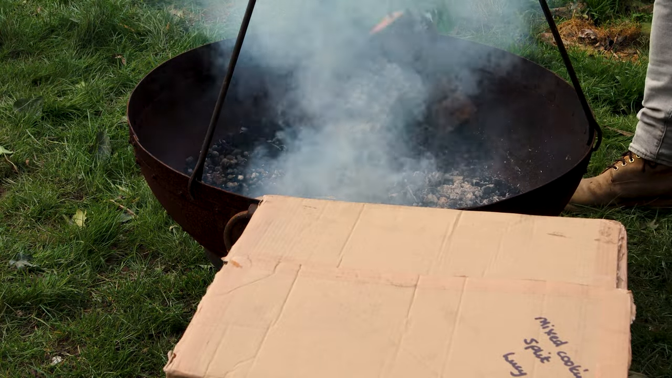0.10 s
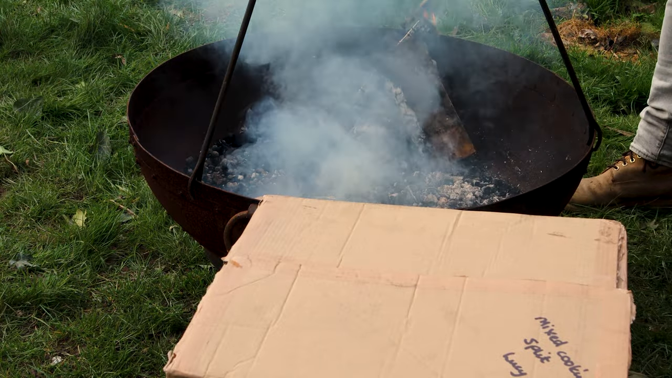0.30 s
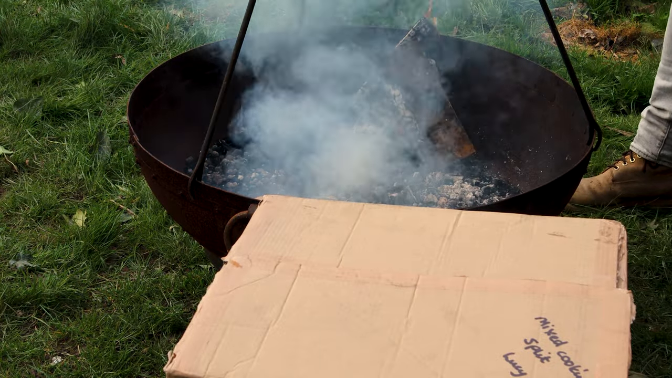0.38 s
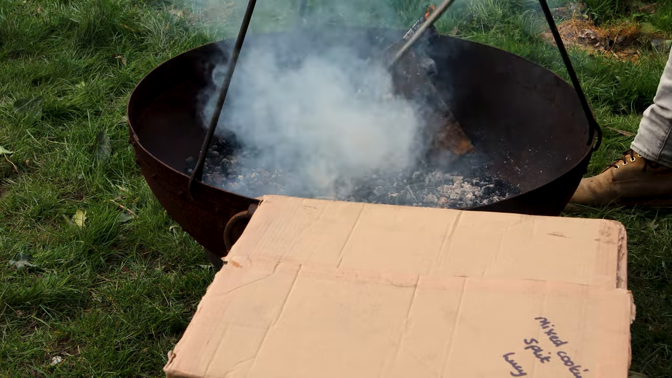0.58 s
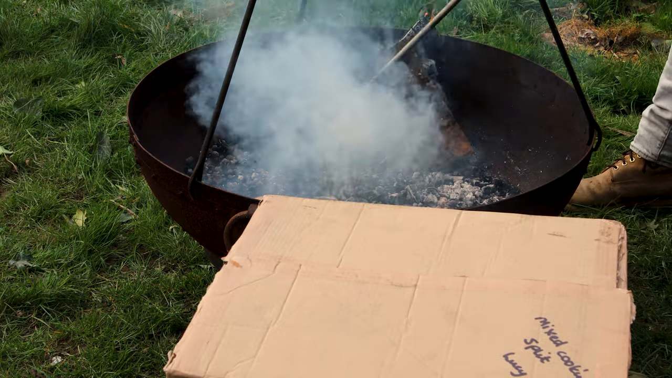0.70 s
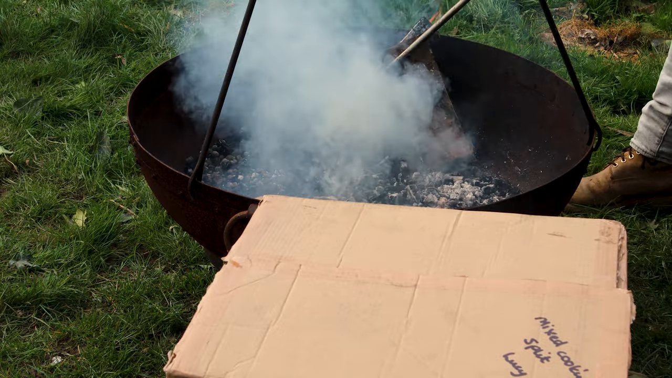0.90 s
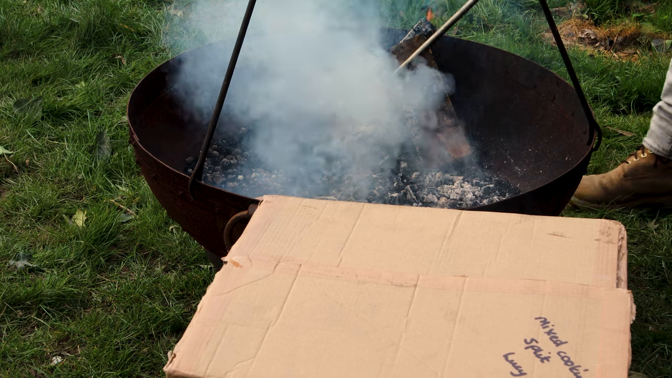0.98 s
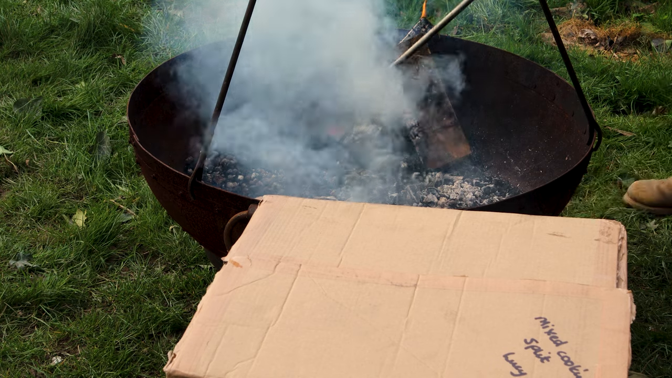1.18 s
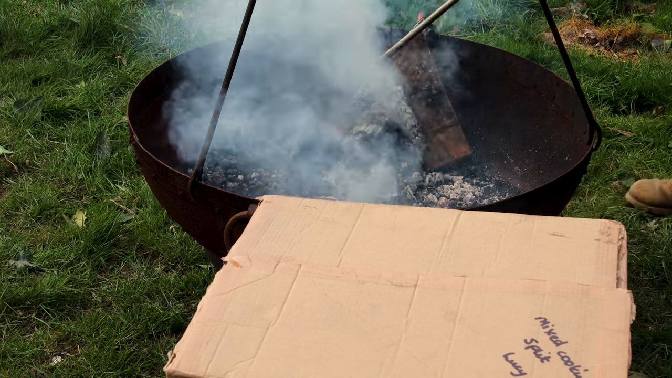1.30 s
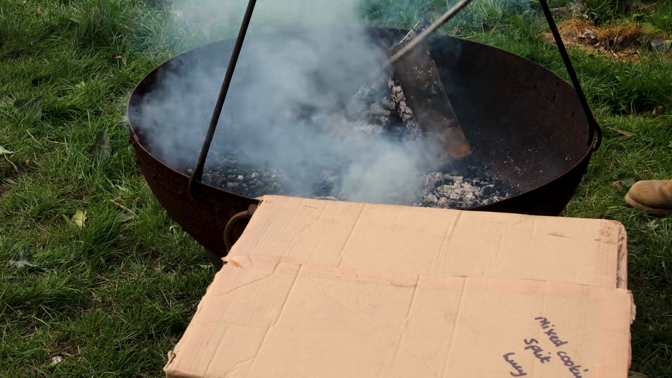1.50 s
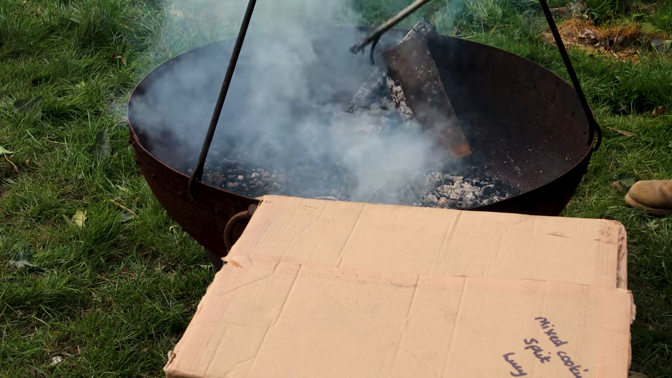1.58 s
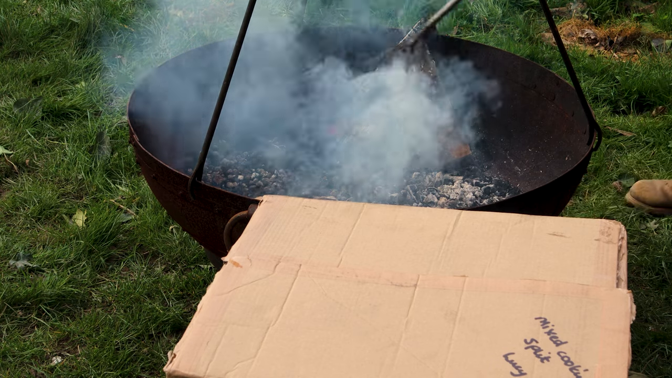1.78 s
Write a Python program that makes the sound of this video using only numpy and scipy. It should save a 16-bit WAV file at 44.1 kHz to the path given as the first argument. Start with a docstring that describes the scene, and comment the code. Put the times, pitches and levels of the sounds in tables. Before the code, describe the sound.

A burning log clangs hard against an iron fire bowl, with wooden knocks and charcoal crunches

```python
"""Tongs shift burning logs in an iron fire bowl, outdoors and close to the microphone.
Charcoal crunches as bursts of clicks, wood is dragged as uneven rubbing noise, and damped log modes knock.
A log then drops against the bowl: modes and ringing noise bands make a clang that overloads the recorder.
The tongs chatter on the iron as repeated struck modes, and more knocks, crunches and fainter blows follow.
Late on come two dry pops of noise; filtered snaps, ticking, a dull rustle and a low background run throughout."""
import sys
import numpy as np
from scipy import signal
from scipy.fft import rfft, irfft
from scipy.io import wavfile
from scipy.ndimage import uniform_filter1d

SR = 44100
rng = np.random.default_rng(int(sys.argv[2]) if len(sys.argv) > 2 else 0)


def to_wav(sig):
    """Store sig (one row per channel, or 1-D mono) as 16-bit WAV at the path in sys.argv[1].

    Samples outside -1..1 are clipped; the rate is SR.
    """
    pcm = np.clip(np.atleast_2d(sig), -1, 1) * 32767
    pcm = np.round(pcm).astype(np.int16)
    wavfile.write(sys.argv[1], SR, pcm.T)  # frames by channels


N = 79380
T = np.arange(N) / SR  # time/s


def undb(db):
    """Amplitude ratio: a level of 20 dB is a factor of ten."""
    return 10 ** (np.asarray(db) / 20)


def unit(x):
    """Normalisation: scale to an rms of 1."""
    return x / np.sqrt(np.mean(x ** 2) + 1e-18)


def at_hz(hz, table, axis=1):
    """Interpolation: read a table column on a logarithmic frequency axis."""
    table = np.array(table, float)
    return np.interp(np.log(hz), np.log(table[:, 0]), table[:, axis])


def colour(x, points, tilt_db=0):
    """Linear filtering: shape the spectrum, tilt it in dB per octave above 500 Hz, and set the rms to 1."""
    hz = np.fft.rfftfreq(N, 1 / SR) + 1
    tilt = tilt_db * np.log2(np.maximum(hz, 500))
    gain = undb(at_hz(hz, points) + tilt)
    return unit(irfft(rfft(x) * gain, N))


def noise():
    """Random excitation: white Gaussian noise."""
    return rng.standard_normal(N)


def delay(x, s):
    """Time shift: start x at s seconds."""
    return np.concatenate([np.zeros(max(int(s * SR), 0)), x, np.zeros(N)])[:N]


def grains(rate, spread_db):
    """Random impulse train: clicks of either sign at a mean rate per second, mostly small, a few large."""
    present = rng.random(N) < rate / SR
    sign = rng.choice([-1, 1], N)
    return present * sign * undb(spread_db * np.minimum(rng.exponential(size=N), 4))


def fade(t60):
    """Exponential decay: fall by 60 dB in t60 seconds, computed over one second."""
    return np.exp(-np.log(1000) * T[:SR] / max(t60, 1e-3))


def ring(hz, t60):
    """Free vibration: one struck mode is a decaying sinusoid."""
    return np.sin(2 * np.pi * hz * T[:SR]) * fade(t60)


# Blows on the bowl: t/s, chatter length/s, relative level/dB, mode level below 1 kHz/dB, above 2.2 kHz/dB
BLOWS = [(0.2483, .010, 2, -0.5, -1), (.3310, 0.0078, -30.5, 3, 8), (0.8361, 0.0033, -35.5, 10, -2),
         (0.8853, 0.0041, -37.5, 4, -23)]
# Clear modes of the iron bowl: f/Hz, relative level/dB, t60/s
BOWL_MODES = [(398, -16.5, .26), (599, -20, .14), (690, -17, .08), (853, -23, .15), (1406, -14, .14),
              (1548, -15, .12), (1648, -21, .18), (1859, -10, .1), (1949, -12, .12), (2064, -16, .11),
              (2470, -20, .18), (2611, -16, .12), (2826, -16, .13), (2978, -18, .11), (3192, -14, .07),
              (3800, -14, .085), (3905, -16, .07), (4473, -26, .12), (5382, -30, .1)]
# Crowd of close modes of bowl and log: f/Hz, spectral level/dB per Hz, t60/s
MODE_CROWD = [(60.9, -2, 0.11), (151, -8.5, .07), (210, -1.5, 0.11), (255, -8, .14), (450, -3.5, 0.2),
              (720, -0.5, .09), (944.4, -11, 0.12), (1240, -4.5, 0.12), (1930, -2.5, 0.12),
              (2880, -1.5, 0.1), (3650, 0, .075), (4940, -15.5, 0.1), (8100, -13.5, 0.049),
              (10800, -28.5, .08), (16000, -28.5, 0.06)]
CROWD_DB, CHATTER_DB, AFTER_DB = -4.5, -3, -33.5  # relative: whole crowd, fed decay, faint after-ring
AFTER_T60_S = 0.28
CHATTER_TOP_HZ = 4440  # feeding shortens towards this frequency; no after-ring from here up
ATTACK_S = .001


def bowl():
    """Modal superposition: each blow rings clear modes and a dense crowd, fed while the contact chatters."""
    out, hz = np.zeros(N), np.fft.rfftfreq(SR, 1 / SR)
    centres = 50 * 2 ** (np.arange(26) / 3)  # third-octave bands
    power = undb(at_hz(centres, MODE_CROWD)) ** 2 * centres
    for s, length, db, low_db, high_db in BLOWS:
        def touch(f):
            """Contact spectrum: each blow weights low and high modes differently."""
            return undb(low_db * (f < 1000) + high_db * (f > 2200))

        spectrum = rfft(rng.standard_normal(SR))
        sound = np.zeros(SR)
        for f, share in zip(centres, power / power.sum()):
            in_band = np.abs(np.log2((hz + 1) / f)) < 1 / 6
            band = unit(irfft(spectrum * in_band, SR))
            t60 = at_hz(f, MODE_CROWD, axis=2)
            fed = length / (1 + (f / CHATTER_TOP_HZ) ** 2)  # high bands are fed for less time
            early = .5 * fade(t60 / 2)
            held = np.exp(-np.log(1000) * np.maximum(T[:SR] - fed, 0) / t60)
            after = undb(AFTER_DB) * fade(AFTER_T60_S) * (f < CHATTER_TOP_HZ)
            envelope = early + undb(CHATTER_DB) * held + after
            sound += undb(CROWD_DB) * np.sqrt(share) * touch(f) * band * envelope
        for f, mode_db, t60 in BOWL_MODES:
            lag = int(rng.random() * length * SR / 2)  # modes start within the first half of the chatter
            sound += undb(mode_db) * touch(f) * np.pad(ring(f, t60), (lag, 0))[:SR]
        attack = np.minimum(T[:SR] / ATTACK_S, 1)
        out += undb(db) * delay(sound * attack, s - ATTACK_S / 2)
    return out


def thump():
    """Recorder overload: a low thump and slow baseline swing at the heaviest blow, high-passed twice."""
    swing = undb(-10) * (np.exp(-T / .024) - np.exp(-T / .001))  # fall and rise time constants/s
    thud = undb(-14) * np.sin(np.pi * np.minimum(T / .009, 1))  # half-sine lasting 9 ms
    b, a = signal.butter(1, 1.5, "high", fs=SR)  # cutoff/Hz
    slump = delay(swing + thud, BLOWS[0][0])
    return -signal.lfilter(b, a, signal.lfilter(b, a, slump))


# Tongs chattering on the iron: t/s, length/s, relative level/dB, brightness/dB per octave, share of free t60
CLINKS = [(.3290, .014, -26.5, -2, 0.94), (0.8868, 0.00388, -39.5, -10.5, 0.36)]
# Modes of the tongs: f/Hz, relative level/dB, free t60/s
TONG_MODES = [(1290, -9, .06), (1660, -2, .1), (1740, -3, .1), (1976, -6, .1), (2446, 1, .08),
              (2562, -9, .1), (3005, -1, .05), (3445, -10, .07), (3800, -7, .05)]
# Spectrum of the rasp, before the tilt: f/Hz, spectral level/dB per Hz
RASP = [(300, -19.5), (900, -15), (1600, 6), (2500, -4), (3600, -14), (5000, -17.5), (9000, -17),
        (16000, -37)]
CLINK_TOUCHES = 4
RASP_DB, RASP_FALL_S = -2, 0.0054  # level re clink, decay time constant


def tongs():
    """Repeated impact: a quick run of touches rasps and rings the steel arms, damped by contact."""
    out = np.zeros(N)
    for s, length, db, tilt_db, free in CLINKS:
        for f, mode_db, t60 in TONG_MODES:
            tilt = tilt_db * np.log2(f / TONG_MODES[1][0])
            tone = undb(db + mode_db + tilt) * ring(f, t60 * free)
            for k in range(CLINK_TOUCHES):
                touch_s = s + length * (k + .5 * rng.random()) / CLINK_TOUCHES
                out += delay(tone, touch_s)
        envelope = np.exp(-np.maximum(T - length, 0) / RASP_FALL_S)
        rasp = envelope * colour(noise(), RASP, tilt_db / 2)
        out += undb(db + RASP_DB) * delay(rasp, s)
    return out


# Knocks on wood: t/s, relative level/dB, pitch factor, brightness/dB per octave
KNOCKS = [(0.1409, -27.5, 0.9, -19), (.1520, -27, 0.97, -11.5), (0.669, -26.5, 0.967, 0.5),
          (.6745, -43, 0.995, -8), (0.762, -38, 0.697, -9), (.8370, -31, 0.564, -4.5),
          (1.4230, -25.5, 1.03, -3), (1.4275, -36, 1.05, 3)]
# Modes of a log: f/Hz before the pitch factor, relative level/dB, t60/s
LOG_MODES = [(355, -8, .05), (565, 1, .036), (660, -7, .025), (985, -3, .032), (1320, -13, .028),
             (1760, -21, .025), (2450, -12, .025), (3250, -18, .03)]
# Spectrum of the crack, before the tilt: f/Hz, spectral level/dB per Hz
WOOD = [(100, -17), (250, 4), (400, 3), (700, 6), (1200, -5.5), (2400, -5), (4200, -19), (5500, -26),
        (16000, -35)]
CRACK_DB, CRACK_FALL_S = -10, 0.0069  # level re knock, decay time constant


def logs():
    """Damped modes: short hollow knocks with a dry crack; a harder contact is brighter."""
    out = np.zeros(N)
    for s, db, pitch, tilt_db in KNOCKS:
        for k, (f, mode_db, t60) in enumerate(LOG_MODES):
            tilt = tilt_db * np.log2(f / LOG_MODES[1][0])
            tone = undb(db + mode_db + tilt) * ring(f * pitch, t60)
            out += delay((-1) ** k * tone, s)  # alternate modes start in opposite phase
        crack = np.exp(-T / CRACK_FALL_S) * colour(noise(), WOOD, tilt_db)
        out += undb(db + CRACK_DB) * delay(crack, s)
    return out


# Charcoal crunching: t/s, length/s, decay time constant/s, level/dB, brightness/dB per octave
CRUNCHES = [(.004, 0.018, 0.0067, -46, -0.5), (0.131, 0.0038, 0.0031, -35, 0),
            (0.1367, 0.0019, 0.0044, -27.5, 2.5), (0.166, 0.0055, 0.014, -44.5, 4),
            (0.227, .012, 0.0089, -42.5, 1.5), (0.267, 0.0079, 0.032, -36.5, -2),
            (0.322, 0.021, 0.0057, -36.5, -6.5), (0.4761, 0.0038, 0.0055, -37, 1),
            (0.488, 0.015, .006, -50.5, 0), (0.6697, 0.0023, .004, -35, 3), (0.754, 0.015, 0.0061, -49, 4),
            (0.8078, 0.0015, 0.0041, -40.5, -5), (0.83, 0.0062, 0.0046, -31.5, 0),
            (1.4253, 0.0028, 0.0067, -36, -5.5)]
# Spectrum of the crunch, before the tilt: f/Hz, spectral level/dB per Hz
CHAR = [(100, -20), (300, -10.5), (900, -11.5), (2000, -4), (3500, 2), (5200, -6.5), (8000, -4.5),
        (11000, -13), (16000, -15.5)]


def charcoal():
    """Brittle fracture: bursts of tiny breaks where the charred skin gives way."""
    out = np.zeros(N)
    for s, length, fall, db, tilt_db in CRUNCHES:
        rise = np.minimum(T / 0.0017, 1)
        envelope = np.exp(-np.maximum(T - length, 0) / fall) * rise
        fractures = colour(grains(rate=5000, spread_db=3.5), CHAR, tilt_db)
        out += undb(db) * delay(envelope * fractures, s)
    return out


# Log dragged through the embers: t/s, relative level of rubbing/dB, relative level of gritty treble/dB
DRAG = [(0, -64, -61.5), (.03, -52, -54), (0.109, -55, -58.5), (.15, -36.5, -49.5), (0.209, -46.5, -51),
        (.40, -45, -91), (.50, -53.5, -56.5), (0.641, -66, -70.5), (.70, -50, -56.5), (.79, -58.5, -62.5),
        (0.849, -45.5, -58), (0.88, -47, -55), (.905, -48, -56.5), (.97, -60.5, -64), (1.09, -58, -58),
        (1.24, -64, -59), (1.39, -66.5, -75), (1.468, -60, -62), (1.66, -68, -69.5), (1.8, -62, -74.5)]
# Spectrum of the rubbing: f/Hz, spectral level/dB per Hz
RUB = [(50, -23.5), (130, -13), (250, 2), (420, -0.5), (700, -6), (1100, -12.5), (1700, -9.5),
       (2500, -14.5), (4000, -15), (6000, -31.5)]
# Spectrum of the gritty treble: f/Hz, spectral level/dB per Hz
GRIT = [(1000, -17), (2200, -3.5), (3500, 7), (5200, -6), (8500, -1), (11000, -11), (16000, -10)]
RUB_DB, GRIT_DB = -0.5, -3.5  # offsets added to the two levels of the drag
SLIP_DB = 2.2  # rms level fluctuation


def drag():
    """Sliding friction: wood rubs over the iron and grinds the ash in dense, uneven slips."""
    s, rub_db, grit_db = np.array(DRAG).T
    unevenness = unit(uniform_filter1d(noise(), size=400))
    slips = undb(SLIP_DB * unevenness)
    rub = undb(RUB_DB + np.interp(T, s, rub_db)) * colour(grains(rate=2500, spread_db=1), RUB)
    grit = undb(GRIT_DB + np.interp(T, s, grit_db)) * colour(grains(rate=3500, spread_db=4), GRIT)
    return slips * (rub + grit)


# Embers snapping: t/s, relative level/dB, centre f/Hz
SNAPS = [(.0785, -56, 12000), (0.4612, -41.5, 3480), (0.4786, -29.5, 3840), (.5570, -43.5, 7150),
         (.563, -42, 11000), (.5865, -46, 6000), (0.6179, -40.5, 6500), (0.671, -46, 8000),
         (0.685, -44, 8800), (0.696, -46, 11100), (0.9423, -45.5, 3020), (0.9809, -42, 4600),
         (1.042, -44, 9000), (1.2595, -36.5, 3030), (1.4807, -48.5, 4000), (1.5245, -45.5, 10000),
         (1.6213, -45, 9020), (1.668, -51, 8900), (1.7187, -47.5, 7000), (1.732, -51, 9000)]
# Dry pops of the burning wood: t/s, level/dB
POPS = [(1.5707, -38), (1.5921, -38)]
# Spectrum of a pop: f/Hz, spectral level/dB per Hz
POP = [(200, -16), (600, 9.5), (1500, 2), (3500, 4.5), (6000, -14), (10000, 1), (16000, -20)]
# Spectrum of the fine ticking: f/Hz, spectral level/dB per Hz
TICK = [(1000, -24), (3000, -6), (8000, -1), (16000, 0.5)]
SNAP_FALL_S, SNAP_TAIL_S, SNAP_TAIL_DB = 0.00034, 0.0026, -19  # time constants, level of the tail
POP_FALL_S = 0.0019  # decay time constant
TICKS_DB = -71


def embers():
    """Impulsive noise: sharp band-passed snaps and a few fuller pops over a fine random ticking."""
    out = undb(TICKS_DB) * colour(grains(rate=110, spread_db=3.5), TICK)
    envelope = np.exp(-T / SNAP_FALL_S) + undb(SNAP_TAIL_DB) * np.exp(-T / SNAP_TAIL_S)
    for s, db, hz in SNAPS:
        b, a = signal.iirpeak(hz, 1 / 1.2, fs=SR)  # bandwidth is 1.2 times the centre frequency
        snap = signal.lfilter(b, a, 2 * envelope * noise())
        out += undb(db) * delay(snap, s)
    for s, db in POPS:
        pop = np.exp(-T / POP_FALL_S) * colour(noise(), POP)
        out += undb(db) * delay(pop, s)
    return out


# Dull rustle under the handling: t/s, level/dB
RUSTLE = [(0, -59.5), (.05, -47.5), (.1, -60.5), (.4, -63), (.52, -57.5), (.6, -71), (.72, -53.5),
          (.87, -62.5), (1.07, -57), (1.15, -70.5), (1.24, -61.5), (1.38, -82), (1.47, -55.5),
          (1.62, -76.5), (1.8, -65.5)]
# Spectrum of the rustle: f/Hz, spectral level/dB per Hz
DULL = [(50, -15), (100, -3), (180, 4), (260, -4), (400, -17.5), (800, -37)]


def rustle():
    """Amplitude modulation: the level of low-frequency noise rises and falls under the handling."""
    s, db = np.array(RUSTLE).T
    return undb(np.interp(T, s, db)) * colour(noise(), DULL)


# Spectrum of the outdoor air: f/Hz, spectral level/dB per Hz
AIR = [(20, -2.5), (60, -2), (130, 2.5), (260, -6), (450, -18), (900, -19), (2000, -27), (6000, -36.5),
       (16000, -39)]
AIR_DB = -61


def air():
    """Stationary noise: a faint low background of still outdoor air."""
    return undb(AIR_DB) * colour(noise(), AIR)


def scene():
    """Linear superposition: all sources and the overload thump add up in one channel."""
    handling = bowl() + thump() + tongs() + logs() + charcoal() + drag()
    return (handling + embers() + rustle() + air())[None]


CLIP_LEVEL, TOP_HZ = .92, 15800  # amplitude re full scale, low-pass edge/Hz


def record(dry):
    """Nonlinear limiting: the recorder clips the clang, then a steep low-pass cuts the top."""
    clipped = np.clip(dry, -CLIP_LEVEL, CLIP_LEVEL)
    low_pass = signal.ellip(8, .2, 60, TOP_HZ, fs=SR, output="sos")
    return signal.sosfilt(low_pass, clipped)


dry = scene()
out = record(dry)
to_wav(out)
```